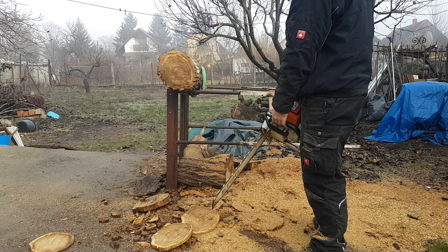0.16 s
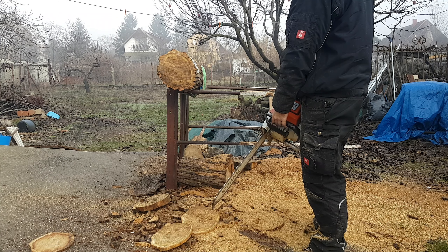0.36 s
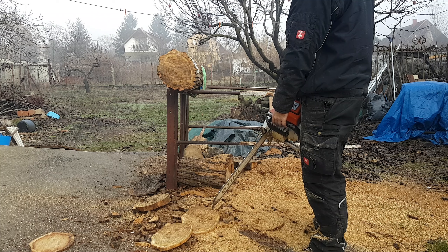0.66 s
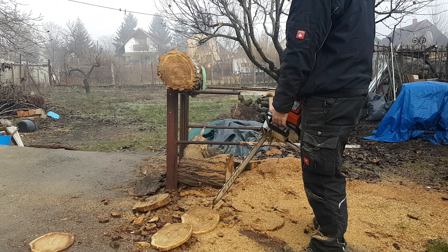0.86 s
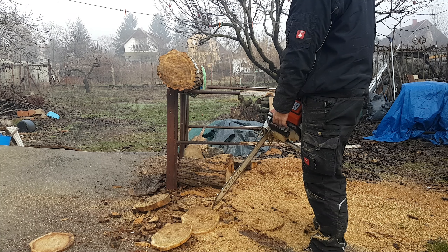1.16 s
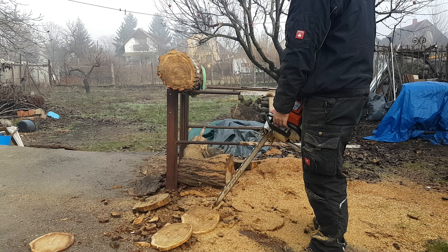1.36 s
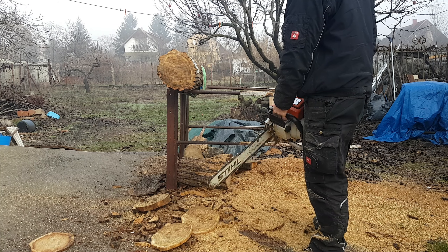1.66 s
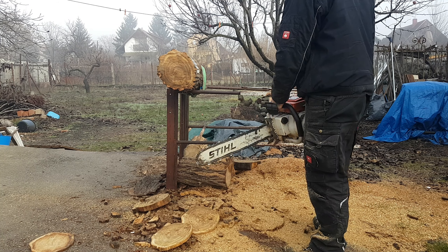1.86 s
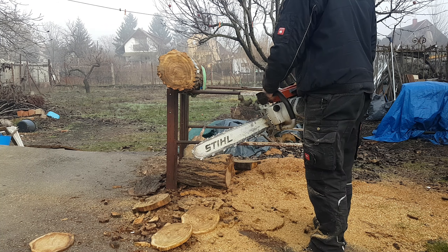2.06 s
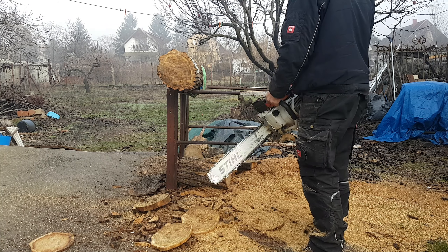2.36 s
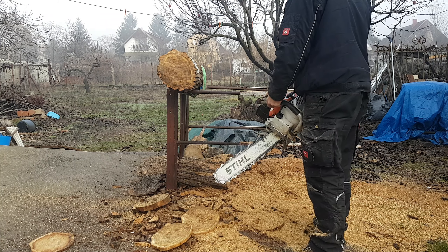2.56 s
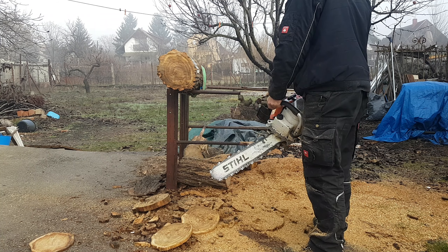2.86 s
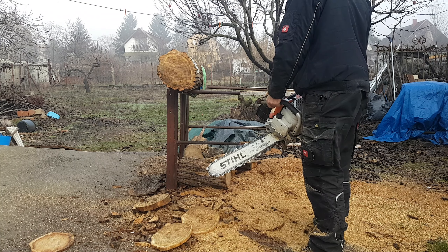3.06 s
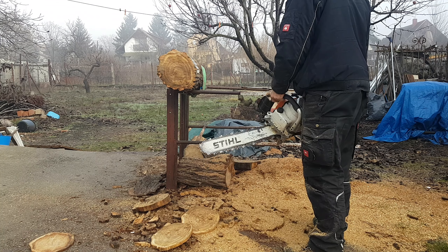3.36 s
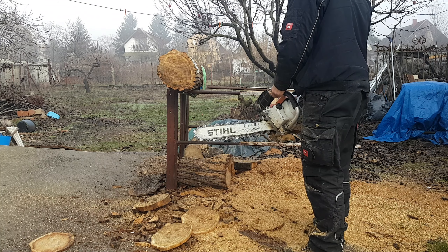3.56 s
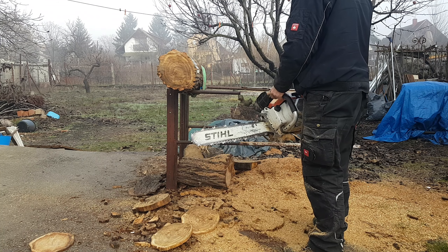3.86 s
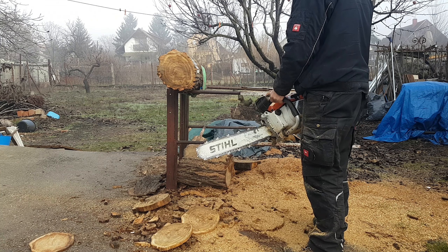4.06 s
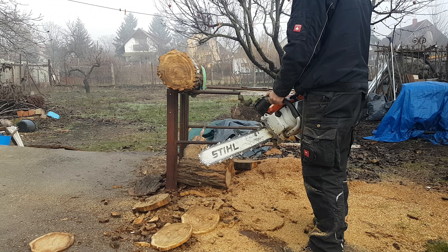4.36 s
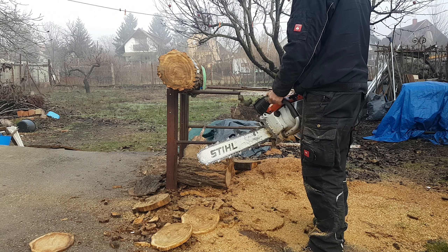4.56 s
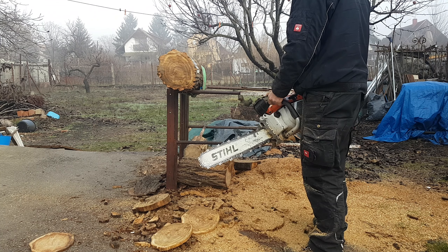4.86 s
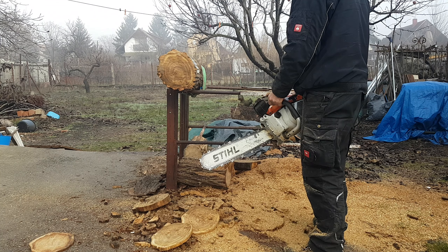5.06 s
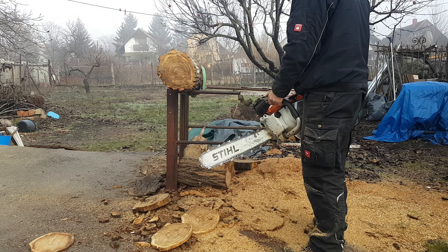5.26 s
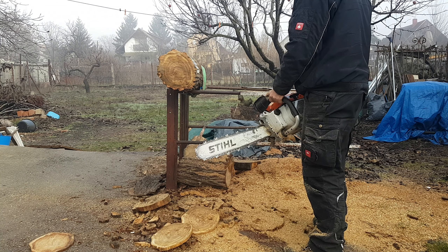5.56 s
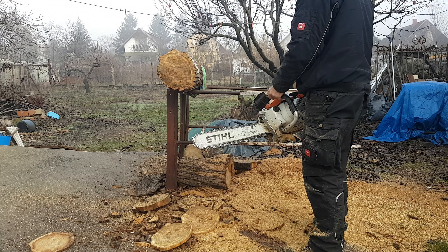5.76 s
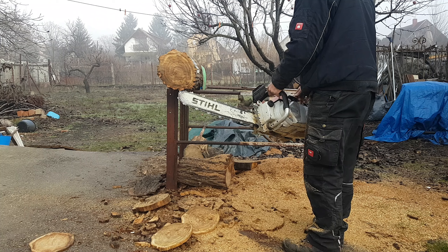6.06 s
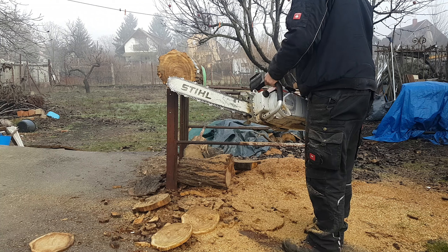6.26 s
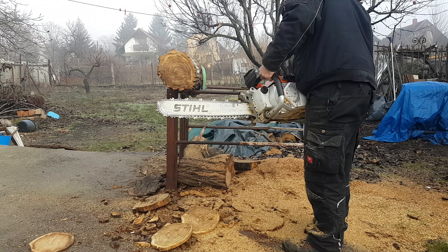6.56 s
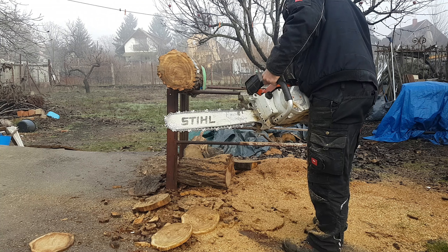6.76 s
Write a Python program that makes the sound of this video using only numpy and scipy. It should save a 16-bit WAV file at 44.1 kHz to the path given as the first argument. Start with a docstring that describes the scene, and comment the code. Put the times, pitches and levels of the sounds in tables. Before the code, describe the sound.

A two-stroke chainsaw idles near the microphone in a garden, popping unevenly over a metallic rattle and a light hiss. Its tone turns fuller as it is swung round, and the bar rings softly now and then. The engine is switched off and runs down with a few slowing knocks. Afterwards there is only a faint village hum, a touch of breeze on the microphone and dogs barking far away.

```python
"""A two-stroke chainsaw idles in a garden: the ports breathe each turn, only some turns fire and pop
through the muffler, piston and chain rattle the case, gas hisses. Jolts ring the bar; the saw is swung
round and its colour changes. Switched off, it runs down against its compression, loose parts knocking.
Far dogs bark over a village hum; a breeze touches the microphones."""
import sys
import numpy as np
from scipy import signal
from scipy.fft import rfft, irfft, next_fast_len
from scipy.io import wavfile
from scipy.ndimage import uniform_filter1d, map_coordinates

SR = 44100
rng = np.random.default_rng(int(sys.argv[2]) if len(sys.argv) > 2 else 0)


def unload_audio(sound):
    """Save the sound as a 16-bit wav file, at the path given as the first command line argument."""
    columns = np.transpose(np.atleast_2d(sound))
    # keep every value between -1 and 1, then stretch to whole-number steps
    steps = np.round(np.clip(columns, -1, 1) * 32767)
    wavfile.write(sys.argv[1], SR, steps.astype(np.int16))


N = 304290
TIME_S = np.arange(N) / SR

# Levels are relative. A pair holds [before, after] the swing.
# crank speed (time [s], speed [turns/s])
IDLE_SPEED = [(0, 40), (1.9, 39.7), (2.7, 37), (5, 36.5)]
# turns that burn well (time [s], level [dB])
FIRINGS = [(0.03, -10.5), (0.105, -13), (0.13, -14), (0.205, -11.5), (0.231, -21), (0.259, -9),
           (0.356, -21), (0.384, -12), (0.485, -15.5), (0.508, -15.5), (0.534, -15), (0.586, -15.5),
           (0.611, -16), (0.636, -15.5), (0.662, -15.5), (0.685, -15), (0.711, -16.5), (0.759, -13.5),
           (0.787, -14), (0.861, -17.5), (0.884, -11), (0.961, -12.5), (1.012, -14), (1.036, -15),
           (1.06, -17), (1.087, -16), (1.11, -16), (1.162, -11.5), (1.186, -13), (1.263, -18.5),
           (1.287, -11), (1.309, -18.5), (1.388, -18.5), (1.413, -11), (1.513, -18), (1.54, -12),
           (1.614, -13), (1.642, -12.5), (1.741, -13.5), (1.763, -11.5), (1.868, -12.5), (1.965, -9.5),
           (2.073, -11.5), (2.172, -14.5), (2.2, -10.5), (2.276, -17), (2.304, -10.5), (2.381, -19.5),
           (2.411, -13), (2.49, -9), (2.595, -14.5), (2.646, -18.5), (2.727, -11), (2.81, -13.5),
           (2.866, -16), (2.947, -7), (3.053, -21), (3.111, -7.5), (3.217, -18), (3.302, -8.5),
           (3.411, -13.5), (3.464, -15), (3.633, -11), (3.713, -11), (3.798, -22.5), (3.826, -14.5),
           (3.88, -16.5), (3.937, -8.5), (4.017, -10), (4.128, -5), (4.236, -8.5), (4.345, -12.5),
           (4.372, -17), (4.455, -11), (4.563, -23), (4.591, -13.5), (4.618, -16)]
# swing of the saw (time [s], share of the way round [0-1])
SWING = [(1.5, 0), (2.05, 0.15), (2.6, 0.5)]
# port breathing (time [s], level [dB])
BREATH_LEVEL = [(0, -18), (1.1, -19), (2.1, -16.5), (2.8, -14), (4.69, -14), (4.76, -20), (4.9, -27),
                (5.05, -67)]
# breathing colour, pair (frequency [Hz], level [dB])
INTAKE_SPECTRA = [
    [(35, -65), (80, -19.5), (107, -3), (124, 3), (189, 0), (247, -3), (275, 0), (324, -6), (348, -13),
     (372, -6.5), (420, -21), (500, -11.5), (600, -23.5), (920, -120)],
    [(35, -53.5), (75, -25.5), (105, -5.5), (146, 4), (172, 7.5), (189, 6.5), (210, -5), (232, -5.5),
     (286, -1), (321, -31.5), (351, -16.5), (420, -39), (550, -25), (920, -120)],
]
# exhaust pop, pair (ring [Hz], width [Hz], level [dB], thud [Hz], width [Hz], level [dB])
MUFFLER_MODES = [(389.5, 250, 7, 127.4, 94, 11), (491, 210, 3, 110, 74, 5)]
# rattle colour, pair (frequency [Hz], level [dB])
RATTLE_SPECTRA = [
    [(210, -62), (350, -10), (492, -2.5), (748, -18), (864, -10), (1210, -10), (1890, -0.5), (2340, -17.5),
     (3280, -21.5), (4380, -12.5), (8000, -43.5), (10400, -76.5), (17600, -120)],
    [(60, -70), (210, -22), (350, -4.5), (404, -8.5), (591, -11.5), (947, -20), (1800, -10.5), (2340, -19),
     (3690, -31), (4500, -32.5), (5540, -33.5), (8000, -43.5), (10400, -79), (17600, -120)],
]
# case resonances, pair (frequency [Hz], width [Hz], level [dB])
CASE_MODES = [
    [(2170, 100, 2.5), (2575, 53, 0), (3150, 24, -16), (3570, 95, -11), (4413, 170, 6.5), (4910, 210, 6.5),
     (6600, 26, -16), (7200, 69, -22.5)],
    [(1560, 51, 3), (1824, 170, 10.5), (2200, 120, 2.5), (3855, 89, 0.5), (4500, 160, 2), (4940, 350, -4.5),
     (6400, 76, -10.5)],
]
# port hiss, pair (frequency [Hz], level [dB])
HISS_SPECTRA = [
    [(3530, 4), (6000, 0.5), (7250, -2.5), (8130, -9.5), (8570, -18.5), (9420, -10.5), (10300, -17),
     (12800, -7.5), (15200, -11.5), (16200, -16.5)],
    [(3530, -1.5), (6000, -0.5), (6380, 2), (6870, -7), (8030, -1), (8720, -12), (13100, 1), (14300, -9.5),
     (15100, -0.5), (15800, -3.5), (16200, -13)],
]
# garden decay (frequency [Hz], t60 [s])
GARDEN_T60 = [(150, .08), (600, .2), (2000, .22), (12000, .08)]
# garden echo of the saw (frequency [Hz], level [dB])
ECHO_SPECTRUM = [(60, -24), (150, -18), (280, -11), (450, -14), (1000, -17), (16000, -18)]
# village hum (frequency [Hz], level [dB])
VILLAGE_SPECTRUM = [(18, -57.5), (30, -19.5), (75, -9.5), (130, -15), (239, -13.5), (415, -9), (461, -4.5),
                    (499, -7.5), (569, -9), (822, -10), (1100, -16), (1190, -18), (2350, -25.5),
                    (3220, -30.5), (4910, -33.5), (16000, -44)]
# breeze (time [s], level [dB])
BREEZE_LEVEL = [(4.9, -50), (5.3, -47), (5.9, -59.5), (6.15, -69.5), (6.9, -73)]
# jolts of the bar (time [s], low ring [dB], high ring [dB])
BAR_JOLTS = [(1.55, -46, -30), (1.8, -31, -40), (2.18, -33, -29), (2.32, -42, -33), (2.96, -27.5, -35),
             (3.111, -32, -32.5), (4.02, -47, -36), (4.125, -35, -32), (4.22, -32.5, -51.5),
             (5.26, -58.5, -83)]
# knocks as the crank slows (time [s], level [dB], treble [dB])
KNOCKS = [(4.695, -35.5, -37.5), (4.7268, -22.5, -28), (4.761, -17, -51.5), (4.796, -18.5, -53),
          (4.8358, -29.5, -48.5), (4.875, -27.5, -59), (4.909, -26, -56), (4.9714, -24.5, -34),
          (5.049, -25.5, -57), (5.105, -35.5, -64.5), (5.139, -26, -47), (5.173, -31.5, -66),
          (5.252, -33, -73), (5.325, -40, -77.5), (5.406, -47.5, -60.5), (5.451, -39.5, -67)]
# knock colour (frequency [Hz], level [dB])
KNOCK_SPECTRUM = [(250, -45), (500, -7), (1000, -5), (1800, -2), (2500, -16.5), (4000, -19), (8000, -35),
                  (16000, -48)]
# casting resonances (frequency [Hz], level [dB], t60 [s])
CASTING_MODES = [(1480, 0, .03), (1780, 0, .03), (2024, -4, .03)]
# compressions, ignition off (time [s], level [dB])
COMPRESSIONS = [(4.698, -11.5), (4.735, -10), (4.765, -6.5), (4.799, -7.5), (4.846, -9), (4.905, -12),
                (4.976, -13), (5.049, -13.5), (5.144, -19), (5.261, -23.5)]
# crankcase air over one slow turn (share of turn [0-1], pitch [Hz], level [dB])
COAST_CYCLE = [(0, 170, -19), (0.12, 128, -1), (0.22, 122, 0), (0.4, 132, -7), (0.6, 170, -14),
               (0.78, 200, -17), (1, 180, -22)]
# barks (time [s], pitch [Hz], level [dB], length [s])
BARKS = [(5.836, 696, -59, 0.027), (5.899, 490, -59.5, 0.11), (6.049, 478, -60, 0.041),
         (6.1, 632, -59, 0.1), (6.352, 650, -50, 0.018), (6.392, 925, -54, 0.062), (6.443, 930, -67, 0.023),
         (6.489, 930, -59, 0.089), (6.614, 613, -57, 0.046), (6.734, 607, -67, 0.069),
         (6.861, 563, -52, 0.0083), (6.893, 835, -53, 0.05)]
# saw balance (frequency [Hz], left minus right [dB])
BALANCE = [(60, 2.0), (110, 2.5), (200, 2.0), (380, 0.0), (700, -1.0), (1290, -2.5), (2380, -2.0),
           (4400, -3.0), (8120, -1.5), (15000, -0.5)]
# left-right likeness of noise (frequency [Hz], coherence [0-1])
COHERENCE = [(60, 0.6), (300, 0.95), (1000, 0.82), (3000, 0.75), (7000, 0.6), (15000, 0.55)]
# noise colours (frequency [Hz], level [dB])
GUST_SPECTRUM = [(15, -40), (40, -6), (70, 0), (150, -8), (300, -40), (600, -120)]
CLICK_SPECTRUM = [(3000, -31), (6000, -6), (16000, -6)]
SCRAPE_SPECTRUM = [(800, -26), (2500, 4), (6000, 2.5), (16000, -10.5)]
MIC_SPECTRUM = [(3000, -12), (9000, -5), (13000, 0), (16000, -2)]

RATTLE_DB, CASE_DB, HISS_DB = (-23, -28), (-8, -3), (-27, -32)  # pairs
IGNITION_OFF_S, STOP_S = 4.686, 5.24
COAST_S = np.clip(TIME_S - IGNITION_OFF_S, 0, None)


def amp(db):
    """Decibels to gain."""
    return 10 ** (np.asarray(db) / 20)


def unit(x):
    """Scale to rms 1."""
    return x / np.sqrt(np.mean(x ** 2) + 1e-20)


def along(points, hz):
    """Interpolate on a log frequency axis."""
    knots_hz, values = np.transpose(points)
    return np.interp(np.log(hz + 1), np.log(knots_hz + 1), values)


def curve(points):
    """Interpolate in time, per sample."""
    return np.interp(TIME_S, *np.transpose(points))


def wobble(rate_hz):
    """Smooth random curve."""
    return map_coordinates(rng.standard_normal(int(N * rate_hz / SR) + 4), [TIME_S * rate_hz])


def filtered(x, response):
    """Apply a complex frequency response."""
    size = 2 * next_fast_len(N // 2 + SR // 4)
    return irfft(rfft(x, size) * response(np.fft.rfftfreq(size, 1 / SR)), size)[..., :N]


def modes(table):
    """Causal response of a set of resonances."""
    return lambda hz: sum((-1) ** k * amp(db) * 1j * hz * width / (peak ** 2 - hz ** 2 + 1j * hz * width)
                          for k, (peak, width, db) in enumerate(table))


def spikes(times_s, gains):
    """Impulse train."""
    return np.bincount(np.clip(np.round(times_s * SR).astype(int), 0, N - 1), gains, N)


def struck(times_s, db, shape):
    """One copy of shape per strike."""
    return signal.fftconvolve(spikes(times_s, amp(db)), shape)[:N]


def fade(t60_s, rise_s=.003, age_s=TIME_S[:SR // 4]):
    """Fast rise, exponential decay."""
    return amp(-60 * age_s / t60_s) * (1 - np.exp(-age_s / rise_s))


def noise(spectrum):
    """Coloured stereo noise, partly coherent."""
    def response(hz):
        spread_rad = np.arccos(along(COHERENCE, hz)) / 2
        return amp(along(spectrum, hz)) * [np.cos(spread_rad), np.sin(spread_rad)]
    mid, side = filtered(rng.standard_normal((2, N)), response)
    return unit(np.array([mid + side, mid - side]))


def swung(before, after):
    """Equal-power crossfade as the saw swings round."""
    share = curve(SWING)
    return np.sqrt(1 - share) * before + np.sqrt(share) * after


def swung_db(pair_db):
    """Level through the swing."""
    return np.interp(curve(SWING), [0, 1], pair_db)


def crank():
    """Turn start times (idle, all): whole turns between firings, then one per compression."""
    fired_s = np.transpose(FIRINGS)[0]
    coast_s = np.transpose(COMPRESSIONS)[0]
    anchors_s = np.r_[fired_s[0] - 2 / IDLE_SPEED[0][1], fired_s, coast_s[0]]
    speed_hz = np.interp(anchors_s[1:], *np.transpose(IDLE_SPEED))
    count = np.r_[0, np.cumsum(np.round(np.diff(anchors_s) * speed_hz))]
    place = np.interp(np.arange(count[-1]), count, np.arange(len(count)))
    share = place % 1
    place -= .096 * share * (1 - share)  # fastest just after a firing
    idle_s = np.interp(place, np.arange(len(anchors_s)), anchors_s)
    return idle_s, np.r_[idle_s, coast_s, 2 * coast_s[-1] - coast_s[-2]]


def crank_angle(turns_s):
    """Angle in turns, per sample."""
    return np.interp(TIME_S, turns_s, np.arange(len(turns_s)))


def breathing(turns_s, lead_turns=.4, sweep_turns=.095):
    """Ports pump once a turn: crank harmonics coloured by intake and crankcase air."""
    angle = uniform_filter1d(crank_angle(turns_s), size=SR // 24, mode="nearest")  # flywheel inertia
    speed_hz = np.gradient(angle) * SR
    hum = np.zeros(N)
    for k in range(2, 16):
        gain = swung(*[amp(along(side, k * speed_hz)) for side in INTAKE_SPECTRA]) * amp(1.6 * wobble(20))
        cycles = k * (angle + lead_turns) - sweep_turns * k * k  # higher harmonics peak later
        hum += gain * np.sin(2 * np.pi * cycles + .28 * wobble(22))
    rms = np.sqrt(np.abs(uniform_filter1d(hum ** 2, size=SR // 4)) + 1e-6)
    return amp(curve(BREATH_LEVEL)) * hum / rms


def exhaust(idle_s, weak_db=-30, drive_db=37):
    """Each charge pops through the muffler, a ring over a thud; most burn weakly."""
    fired_s, fired_db = np.transpose(FIRINGS)
    idle_db = weak_db + 3 * rng.standard_normal(len(idle_s))
    pops = spikes(np.r_[fired_s, idle_s] - .0005, amp(np.r_[fired_db, idle_db] + drive_db))

    def muffler(ring_hz, ring_width_hz, ring_db, thud_hz, thud_width_hz, thud_db):
        ring = modes([(ring_hz, ring_width_hz, 0)])
        thud = modes([(thud_hz, thud_width_hz, 0)])
        return filtered(pops, lambda hz: amp(ring_db) * ring(hz) ** 3 + amp(thud_db) * thud(hz) ** 2)
    return -swung(*[muffler(*side) for side in MUFFLER_MODES])


def bursts(turns_s, depth_db, scatter_db, kick, lead_turns=.3):
    """Envelope peaking near each turn's start; a firing strengthens the next few."""
    angle = crank_angle(turns_s) + lead_turns
    strength_db = scatter_db * rng.standard_normal(len(turns_s) + 1)[angle.astype(int)]
    dip = np.interp(angle % 1, [0, .15, .27, .4, .7, 1], [1, .75, 0, .45, .65, 1])
    burst = uniform_filter1d(amp(strength_db - depth_db * dip), size=60)
    burst /= np.sqrt(np.abs(uniform_filter1d(burst ** 2, size=SR // 5)))
    fired_s, fired_db = np.transpose(FIRINGS)
    age_s = TIME_S[:SR // 3]
    surge = struck(fired_s - .016, fired_db, (1 - np.exp(-age_s / .03)) * np.exp(-age_s / .05))
    return unit(burst * (1 + kick * surge))


def piston_slap(turns_s):
    """The piston hits the bore four times a turn."""
    scatter = rng.standard_normal((len(turns_s), 2, 4))
    times_s = turns_s[:, None] + [.019, -.003, -.0031, .016] + .00077 * scatter[:, 0]
    gains = amp([1.5, -4, -2, -5.5] + 2.8 * scatter[:, 1]) * [1, -1, 1, -1]
    return spikes(times_s.ravel(), gains.ravel())


def clatter(turns_s, sag_db_per_s=38, case_sag_db_per_s=50, stop_db_per_s=75):
    """Piston, clutch and chain rattle and shake the case; the case dies away first."""
    rattle = swung(*[noise(side) for side in RATTLE_SPECTRA]) * unit(amp(1.7 * wobble(300)))
    rattle *= bursts(turns_s, depth_db=8, scatter_db=1.2, kick=1.4)
    mid, side = rng.standard_normal((2, N)) * [[1], [.6]]
    shake = np.array([mid + side, mid - side]) + amp(38) * piston_slap(turns_s)
    case = swung(*[unit(filtered(shake, modes(table))) for table in CASE_MODES])
    case *= bursts(turns_s, depth_db=10, scatter_db=2, kick=3)
    case *= amp(swung_db(CASE_DB) - case_sag_db_per_s * COAST_S)
    stopped_s = np.clip(TIME_S - STOP_S, 0, None)
    level_db = swung_db(RATTLE_DB) - sag_db_per_s * COAST_S - stop_db_per_s * stopped_s
    return amp(level_db) * (rattle + case)


def port_hiss(turns_s, sag_db_per_s=119):
    """Gas hisses at the ports each turn, pulsing harder after the swing."""
    hiss = swung(*[noise(side) for side in HISS_SPECTRA]) * unit(amp(1.4 * wobble(550)))
    before = bursts(turns_s, depth_db=4, scatter_db=1.5, kick=1.5, lead_turns=.22)
    after = bursts(turns_s, depth_db=14, scatter_db=2.5, kick=8)
    share = curve(SWING)
    return amp(swung_db(HISS_DB) - sag_db_per_s * COAST_S) * hiss * before ** (1 - share) * after ** share


def garden(x):
    """Sheds and fences reflect; decay time varies with frequency."""
    hz, age_s, bins = signal.stft(rng.standard_normal((2, SR // 2)), SR, nperseg=256)
    tail = signal.istft(bins * amp(-60 * age_s / along(GARDEN_T60, hz)[:, None]), SR, nperseg=256)[1]
    delayed = np.pad(x, (200, 0))[None]
    return signal.fftconvolve(delayed, tail / np.linalg.norm(tail[0]), axes=1)[:, :N]


def village():
    """Distant wavering hum."""
    return amp(-61 + 1.8 * wobble(9)) * noise(VILLAGE_SPECTRUM)


def breeze():
    """Gusts rumble on the microphone ports."""
    return amp(curve(BREEZE_LEVEL) + 3 * wobble(12)) * noise(GUST_SPECTRUM)


def bar_ring(low_hz=1338, high_hz=2946):
    """Jolts ring the bar at two pitches."""
    times_s, low_db, high_db = np.transpose(BAR_JOLTS)
    shape = fade(t60_s=1.17, rise_s=.012, age_s=TIME_S[:SR])
    ring = np.zeros(N)
    for db, hz in [(low_db, low_hz), (high_db, high_hz)]:
        swell = struck(times_s, db, shape) * amp(2.5 * wobble(30))
        ring += swell * np.sin(2 * np.pi * hz * TIME_S + .6 * wobble(40))
    return ring


def knocks(casting_db=-10):
    """Piston and loose parts knock as the crank slows; each knock rings the casting."""
    times_s, db, treble_db = np.transpose(KNOCKS)
    metal = struck(times_s, db, fade(t60_s=.047)) * noise(KNOCK_SPECTRUM)
    metal += struck(times_s, treble_db, fade(t60_s=.03)) * noise(CLICK_SPECTRUM)
    scatter_db = 2.4 * rng.standard_normal((len(times_s), len(CASTING_MODES)))
    for (hz, mode_db, t60_s), offset_db in zip(CASTING_MODES, scatter_db.T):
        ring = fade(t60_s) * np.sin(2 * np.pi * hz * TIME_S[:SR // 4])
        metal += struck(times_s, db + mode_db + casting_db + offset_db, ring)
    return metal


def rundown(turns_s, overtone_hz=224, overtone_db=40, halt_db_per_turn=70):
    """Crankcase air hums, pitched by the piston; each compression strikes an overtone."""
    times_s, db = np.transpose(COMPRESSIONS)
    share, hz, shape_db = np.transpose(COAST_CYCLE)
    count = len(times_s)
    angle = crank_angle(turns_s[-count - 1:])
    level_db = np.interp(angle, np.arange(count) + share[1], db) + np.interp(angle % 1, share, shape_db)
    level_db -= halt_db_per_turn * np.clip(angle - (count - .5), 0, 1)  # dies halfway through the last turn
    coasting = (angle > 0) * (angle < count)
    swell = uniform_filter1d(amp(level_db + 2.6 * wobble(60)) * coasting, size=200)
    pitch_hz = uniform_filter1d(np.interp(angle % 1, share, hz), size=200)
    hum = swell * np.sin(2 * np.pi * np.cumsum(pitch_hz) / SR)
    overtone = modes([(overtone_hz, 45, 0)])
    return hum + filtered(spikes(times_s, amp(db + overtone_db)), lambda hz: overtone(hz) ** 2)


def ping(time_s=5.258, pitch_hz=4890, level_db=-57):
    """A loose part rings once."""
    swell = struck(np.array([time_s]), [level_db], fade(t60_s=.15))
    return swell * np.sin(2 * np.pi * pitch_hz * TIME_S + 1.5 * wobble(150))


def chain_slip(time_s=5.401, level_db=-55):
    """The chain slips with a short scrape."""
    age_s = np.clip(TIME_S - time_s, 0, None)
    return amp(level_db) * fade(t60_s=.11, age_s=age_s) * noise(SCRAPE_SPECTRUM)


def dogs():
    """Far barks, worn down to one rough tone each."""
    barks = np.zeros(N)
    for time_s, hz, db, length_s in BARKS:
        swell = amp(db + 3) * np.exp(-8 * ((TIME_S - time_s) / length_s) ** 2)
        phase_rad = 2 * np.pi * hz * TIME_S + .74 * wobble(67)
        barks += swell * (np.sin(phase_rad) + amp(-16.5) * np.sin(2 * phase_rad))
    return barks


def scene(lag_s=4 / SR):
    """Saw slightly off centre, reaching the right microphone first; village, breeze and dogs around it."""
    idle_s, turns_s = crank()
    air = breathing(turns_s) + rundown(turns_s) + exhaust(idle_s)
    waver = amp(1.3 * wobble(6))
    bright = waver * (clatter(turns_s) + port_hiss(turns_s))
    bright += bar_ring() + knocks() + chain_slip() + ping()
    saw = air + filtered(bright, lambda hz: (1j * hz / (200 + 1j * hz)) ** 3)
    saw += filtered(garden(saw.mean(0)), lambda hz: amp(along(ECHO_SPECTRUM, hz)))
    saw = filtered(saw, lambda hz: (1j * hz / (45 + 1j * hz)) ** 2)  # the saw carries no deep bass
    sides = np.array([[.5], [-.5]])
    saw *= amp(sides * swung(-.38, .79))
    saw = filtered(saw, lambda hz: amp(sides * along(BALANCE, hz)) * np.exp(-2j * np.pi * hz * sides * lag_s))
    ambience = village() + breeze()
    barks = dogs()
    return saw + ambience + barks + amp(-1.5) * garden(barks)


def record(dry, low_cut_hz=30, top_hz=16100):
    """Microphone hiss, soft clipping, band limits."""
    hiss = amp(-79.5) * noise(MIC_SPECTRUM)
    soft = dry / (1 + np.abs(dry / .95) ** 4) ** (1 / 4)
    return filtered(soft + hiss, lambda hz: (hz < top_hz) * (1j * hz / (low_cut_hz + 1j * hz)))


dry = scene()
out = record(dry)
unload_audio(out)
```